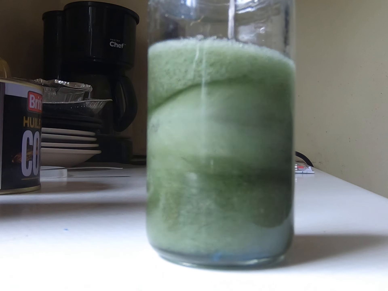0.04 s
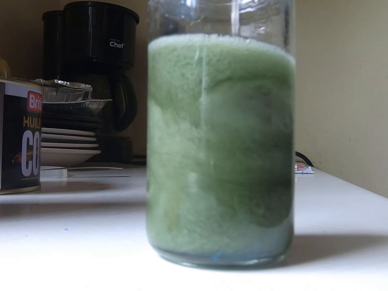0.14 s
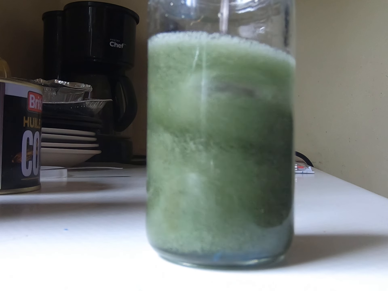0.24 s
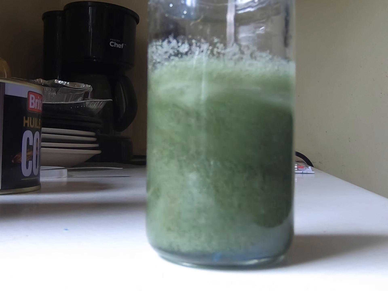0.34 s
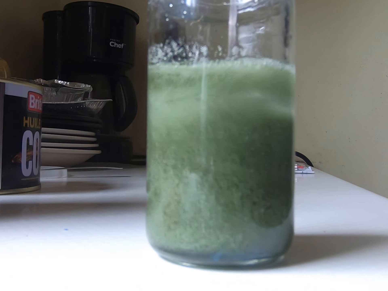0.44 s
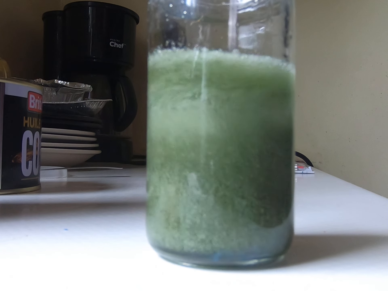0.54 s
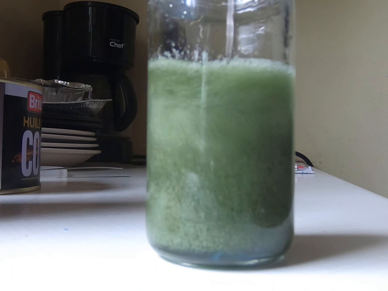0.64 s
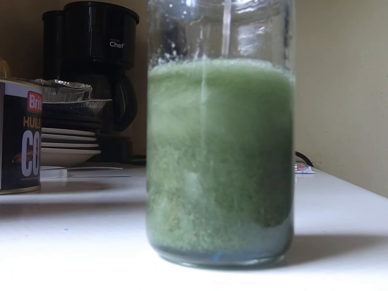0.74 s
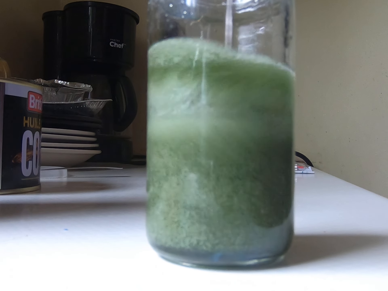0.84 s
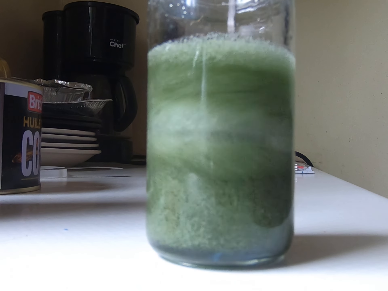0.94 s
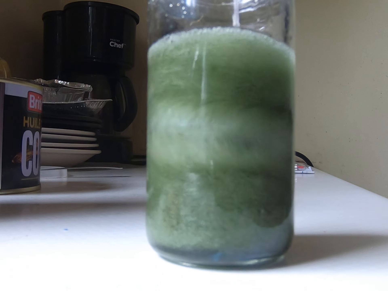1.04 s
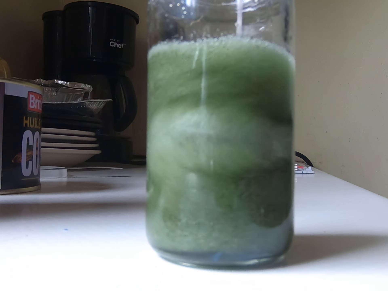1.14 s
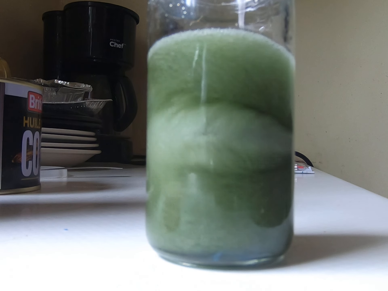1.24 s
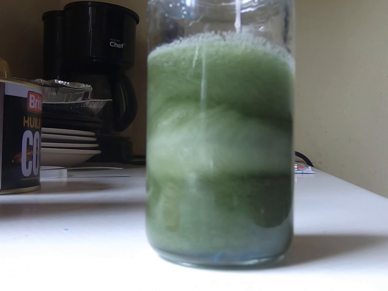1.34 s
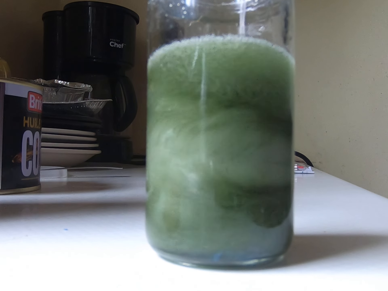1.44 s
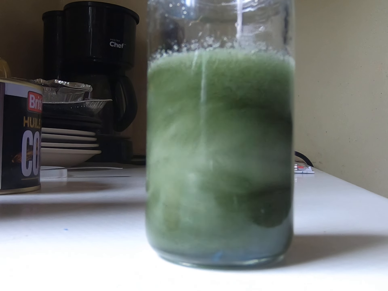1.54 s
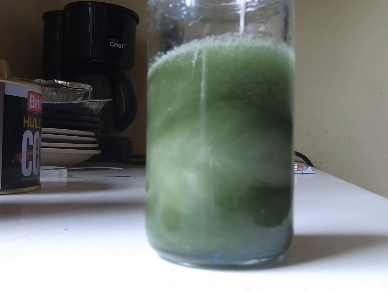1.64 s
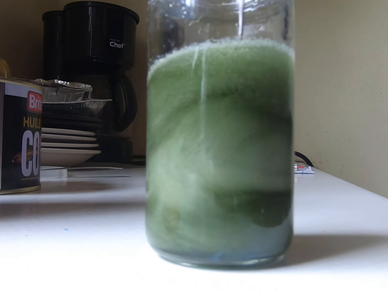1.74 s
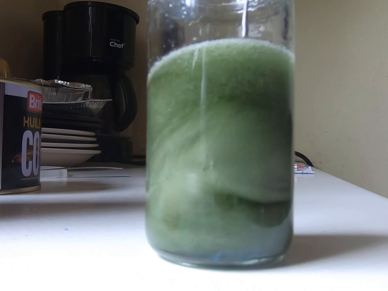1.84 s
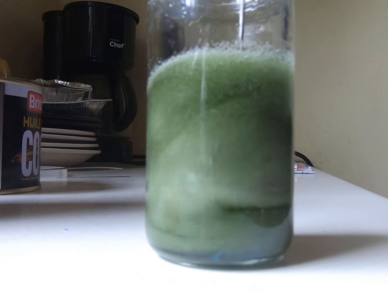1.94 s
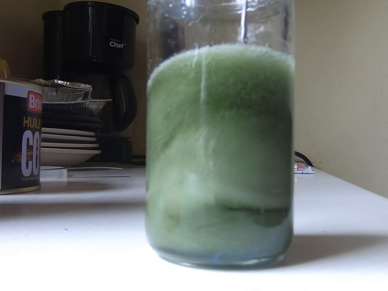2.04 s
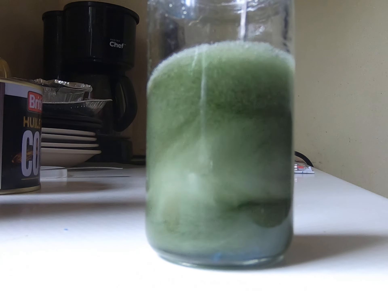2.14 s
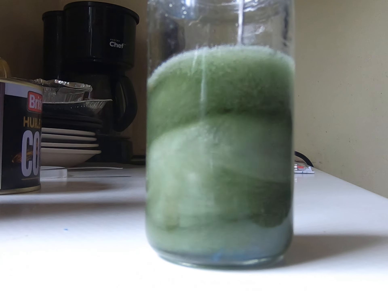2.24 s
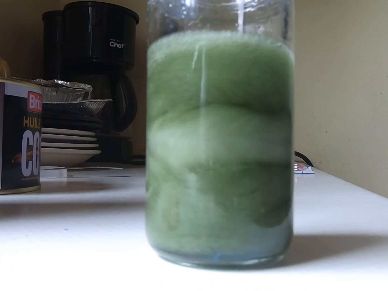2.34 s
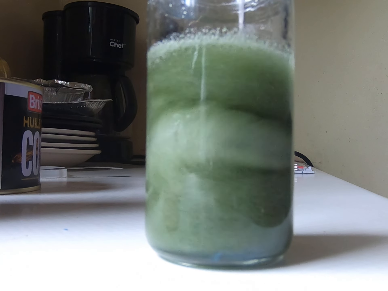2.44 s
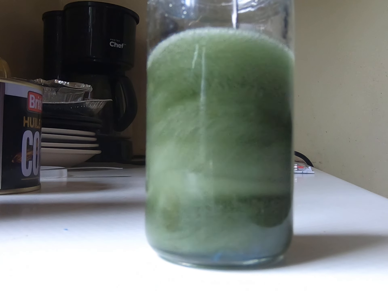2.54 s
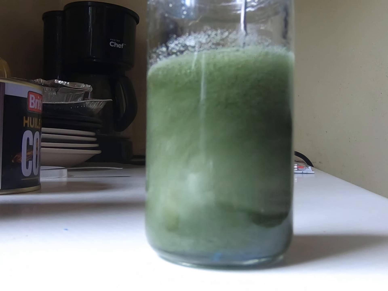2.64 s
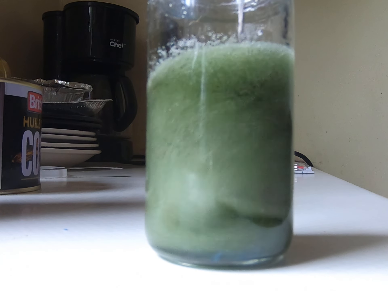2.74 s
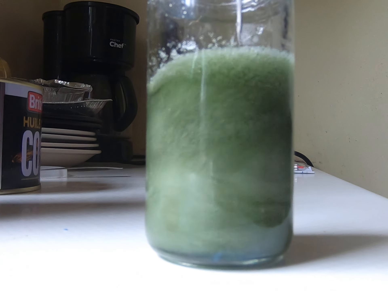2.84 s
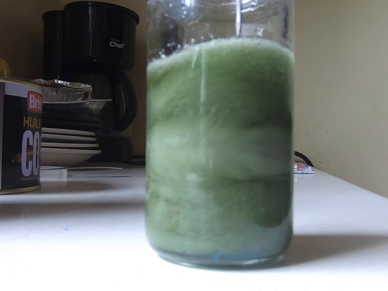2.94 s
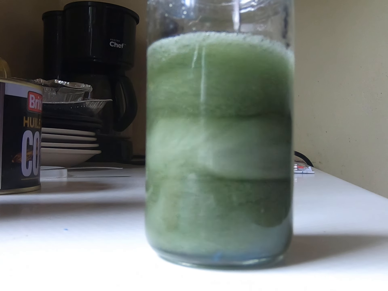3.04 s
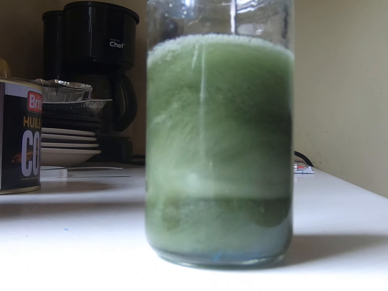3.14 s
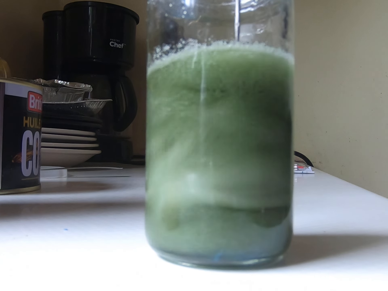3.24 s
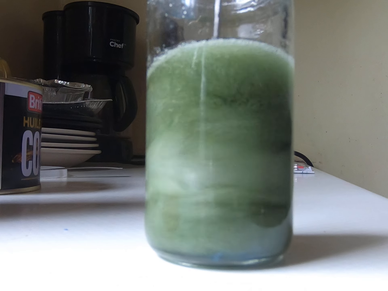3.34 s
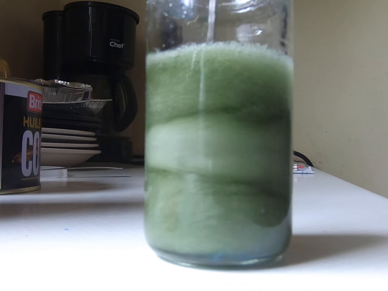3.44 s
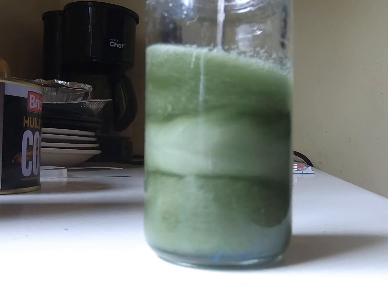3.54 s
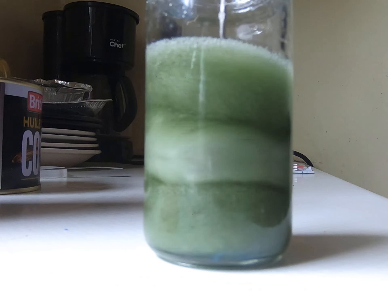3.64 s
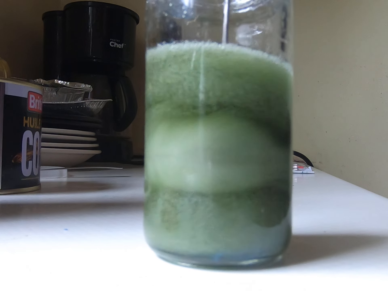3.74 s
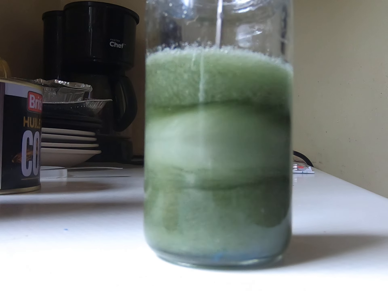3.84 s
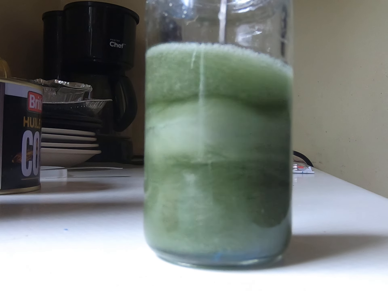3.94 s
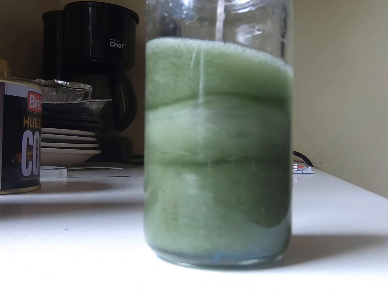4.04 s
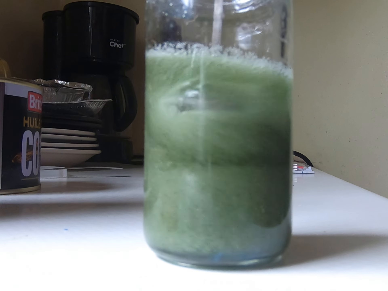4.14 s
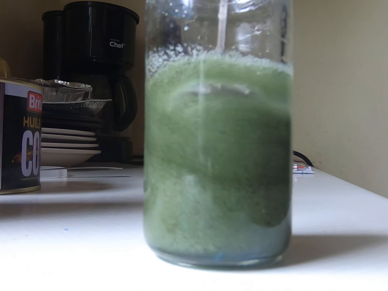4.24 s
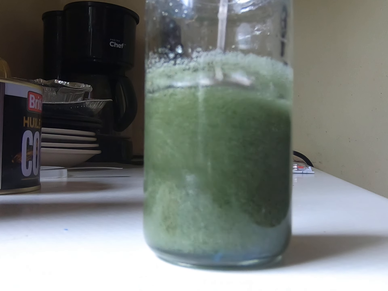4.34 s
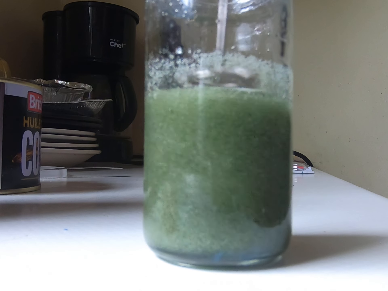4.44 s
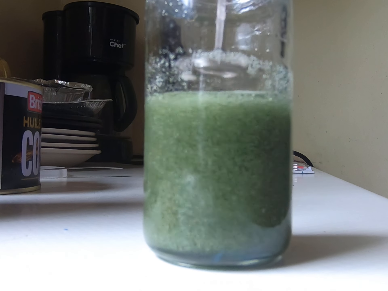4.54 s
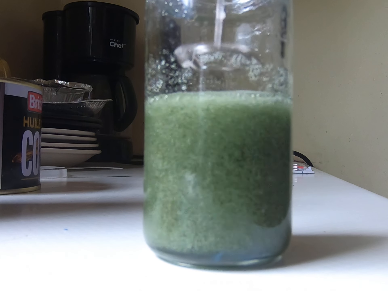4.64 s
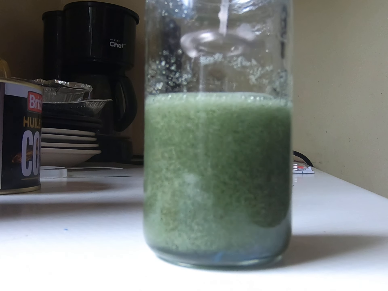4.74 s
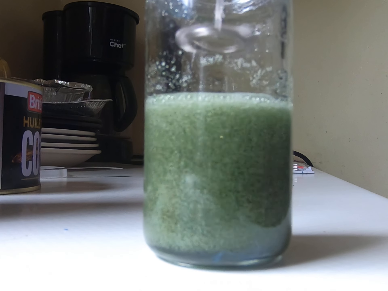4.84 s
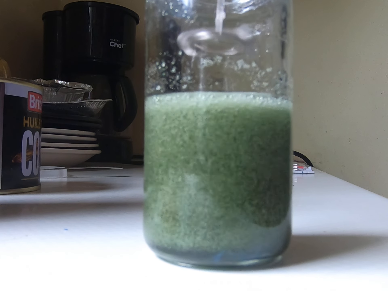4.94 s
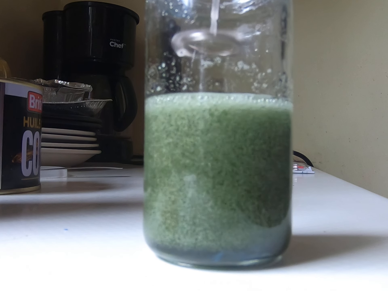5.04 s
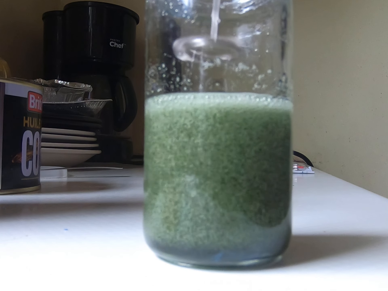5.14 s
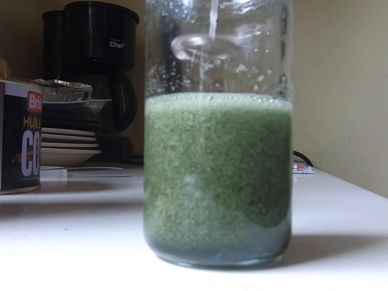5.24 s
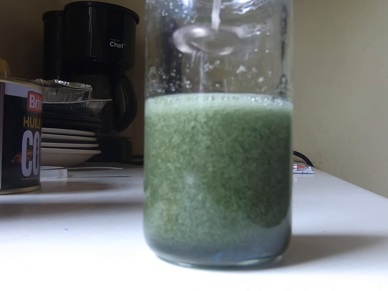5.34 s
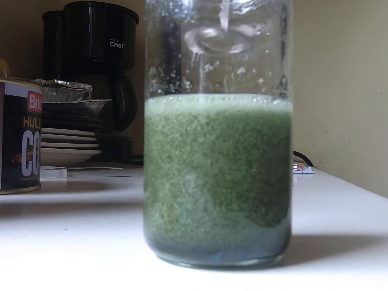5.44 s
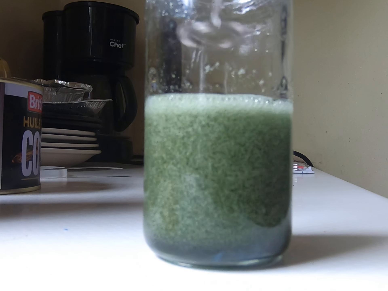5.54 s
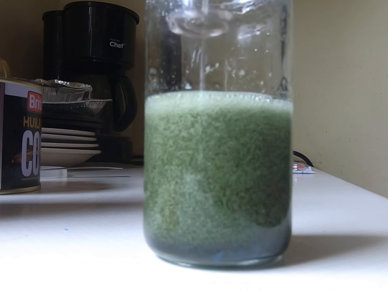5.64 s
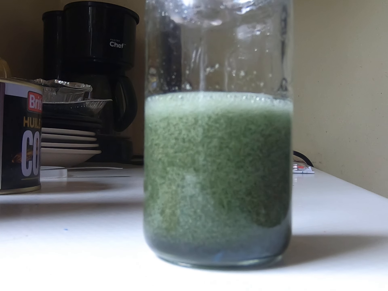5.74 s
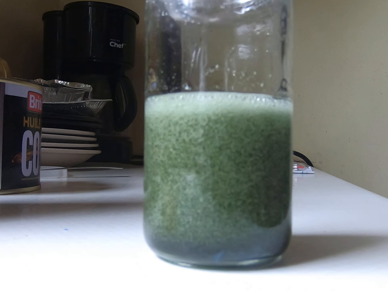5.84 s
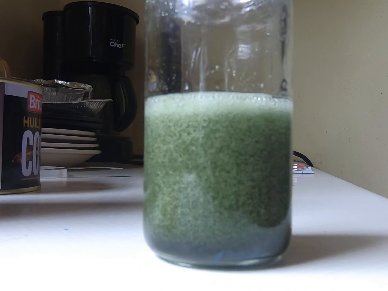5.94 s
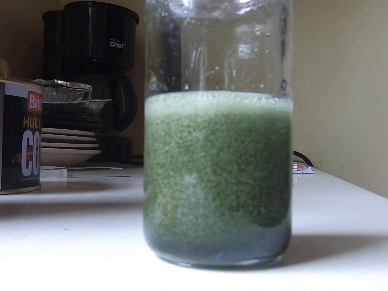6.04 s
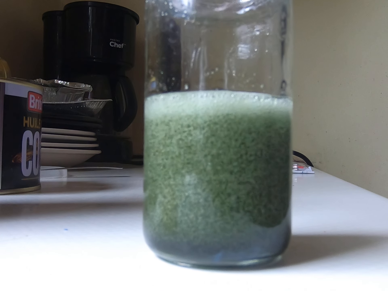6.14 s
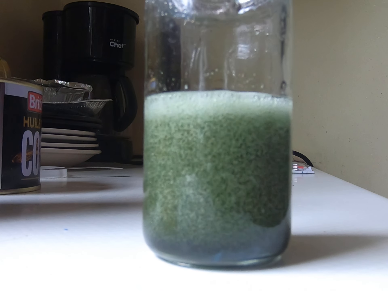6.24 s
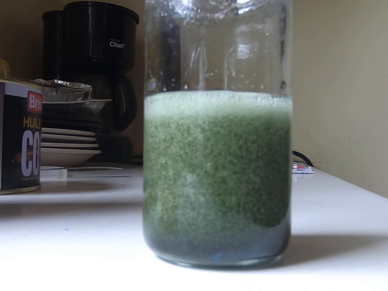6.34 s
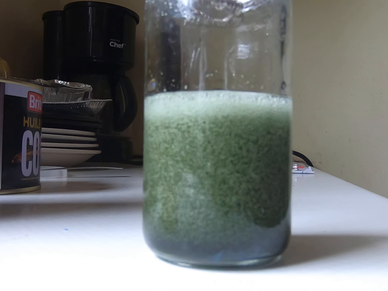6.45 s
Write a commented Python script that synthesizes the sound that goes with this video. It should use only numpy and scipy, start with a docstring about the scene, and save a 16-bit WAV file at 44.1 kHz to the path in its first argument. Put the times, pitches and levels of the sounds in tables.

```python
"""Battery whisk in a glass jar

A small battery whisk churns oil and wax in a glass jar on a kitchen counter, close to the microphone.
Deep in the liquid the motor labours and the vortex gulps air; near the surface it speeds up and rattles.
Lifted clear it buzzes cleanly, brushes the glass, and runs down with a few last knocks.
One turning shaft times the tones, scrapes and knocks; shaped noise bursts make the liquid and glass."""
import sys
import numpy as np
from scipy import signal
from scipy.fft import rfft, irfft
from scipy.io import wavfile
from scipy.ndimage import uniform_filter1d

SR = 44100
rng = np.random.default_rng(int(sys.argv[2]) if len(sys.argv) > 2 else 0)


def to_wav(s):
    """Save 16-bit WAV."""
    ch = np.atleast_2d(s).T  # columns
    pcm = np.round(np.clip(ch, -1, 1) * 32767)  # PCM
    wavfile.write(sys.argv[1], SR, pcm.astype(np.int16))


N = 285765
TIME = np.arange(N) / SR  # seconds

# Shaft speeds (turns per second): deep in the liquid, skimming the surface, free in the air
LADEN_HZ, SKIM_HZ, FREE_HZ = 55, 146, 184.2
STALL_HZ = 34.6  # below this speed the motor fades out
# Moments (s): out of the liquid, spray flung off, drawn higher away from the microphone, switched off
OUT_S, SHED_S, RAISED_S, OFF_S = 4.51, 4.63, 5.65, 5.94


def gain_of(db):
    """Turns decibels into amplitude."""
    return 10 ** (np.asarray(db) / 20)


def evened(x):
    """Scales to an rms of one."""
    return x / np.sqrt(np.mean(x ** 2) + 1e-20)


def steadied(x, size=4000):
    """Scales to a running rms of about one."""
    power = uniform_filter1d(uniform_filter1d(x ** 2, size), size)
    return x / np.sqrt(abs(power) + 1e-4 * np.mean(x ** 2))


def ramp(x, start, end):
    """Goes from 0 to 1 as x goes from start to end."""
    return np.clip((x - start) / (end - start), 0, 1)


def held(s, length, db, onset_db_per_s=249, release_db_per_s=117):
    """A gain that rises quickly to db at time s, holds, and dies away."""
    early = np.maximum(s - TIME, 0)
    late = np.maximum(TIME - s - length, 0)
    return gain_of(db - onset_db_per_s * early - release_db_per_s * late)


def read(points, hz):
    """Reads a frequency table, joining its points on a log-frequency axis."""
    f, value = np.transpose(points)
    return np.interp(np.log(hz + 1), np.log(f + 1), value)


def drift(hz):
    """Random wandering of about unit size, with hz new random points a second."""
    knots = rng.standard_normal(N // 20)
    return np.interp(TIME * hz, np.arange(len(knots)), knots)


def add(mix, s, sound):
    """Mixes a sound in at time s."""
    part = mix[max(round(s * SR), 0):][:len(sound)]
    part += sound[:len(part)]


def colour(x, points, rings=(), size=4096):
    """Passes x through a body with this spectrum and these narrow rings, which answers only after the blow."""
    hz = abs(np.fft.fftfreq(size, 1 / SR))
    octaves_above = np.maximum(np.log2((hz + 1) / points[-1][0]), 0)
    octaves_below = np.maximum(np.log2(points[0][0] / (hz + 1)), 0)
    gain = gain_of(read(points, hz) - 30 * (octaves_above + octaves_below))
    gain = gain * (1 + sum(gain_of(db) / (1 + (2 * (hz - f) / width) ** 2) for f, width, db in rings))
    log_gain = np.log(gain + 1e-5)
    # Minimum phase: nothing sounds before the blow
    response = np.fft.ifft(np.exp(np.conj(signal.hilbert(log_gain)))).real
    return signal.oaconvolve(x, response)[:N]


def strikes(turns, place, jitter, spread_db, size=8):
    """One sharp impulse each time the shaft passes a place, loose in angle (turns) and in strength."""
    n = np.arange(1, int(turns[-1]))
    slip, force = rng.standard_normal((len(n), 2)).T
    at = np.interp(n + place + jitter * slip, turns, np.arange(N))
    taps = at.astype(int)[:, None] + np.arange(1 - size, size + 1)
    offset, out = taps - at[:, None], np.zeros(N)
    strength = gain_of(spread_db * np.clip(force, -2, 2))[:, None]
    # A windowed sinc places each impulse between samples
    impulse = np.sinc(offset) * np.cos(np.pi * offset / (2 * size)) ** 2
    np.add.at(out, np.clip(taps, 0, N - 1), strength * impulse)
    return out


def chatter(x, decay_s, size=400):
    """Spreads each contact into a brief chatter, nearly keeping its colour."""
    burst = rng.standard_normal(size) * np.exp(-np.arange(size) / (decay_s * SR))
    flat = irfft(np.exp(1j * np.angle(rfft(burst, 2 * size))))[:size]
    return np.convolve(x, flat)[:N]


def blows(rows, points, decay_s, size=2500):
    """For each row of (t/s, peak level/dB) a short burst of noise rings a body."""
    out, t = np.zeros(N), np.arange(size) / SR
    for s, db in rows:
        ring = colour(rng.standard_normal(size) * np.exp(-t / decay_s), points)
        add(out, s, gain_of(db) * ring / abs(ring).max())
    return out


# Faint low background of the kitchen: f/Hz, level/dB (per Hz, relative)
KITCHEN_COLOUR = [(20, -7), (50, 5.5), (100, -11), (150, 1.5), (200, 6), (260, -4), (500, -10), (1000, -21),
                  (4000, -41), (15000, -33)]


def kitchen(db=-73):
    """Faint low room noise, partly shared by the two microphone ports."""
    shared, left, right = (evened(colour(rng.standard_normal(N), KITCHEN_COLOUR)) for _ in range(3))
    return gain_of(db) * np.array([shared + .5 * left, shared + .5 * right])


# Colour of the echoes when they start: f/Hz, level/dB (relative)
ECHO_COLOUR = [(150, -5), (400, 5), (800, 3.5), (2000, 1), (6000, 1.5), (8500, 5), (13000, 2.5)]
# Time the echoes take to fall by 60 dB: f/Hz, t/s
ECHO_TIMES = [(150, 1.8), (300, 0.23), (600, 0.47), (2000, 0.44), (6000, 0.29), (14000, 0.18)]


def room(x, size=30000):
    """Reflections from the counter and walls, each band dying at its own speed."""
    sparse = rng.random((2, size)) < .1
    taps = rng.standard_normal((2, size)) * sparse * (np.arange(size) > .002 * SR)
    hz, t, z = signal.stft(taps, SR, nperseg=256)
    field_db = read(ECHO_COLOUR, hz)[:, None] - 60 * t / read(ECHO_TIMES, hz)[:, None]
    tail = signal.istft(z * gain_of(field_db), SR, nperseg=256)[1]
    return signal.fftconvolve(x[None], tail / np.linalg.norm(tail[0]), axes=1)[:, :N]


# Left port against right: f/Hz, level/dB (left minus right)
PORT_BALANCE = [(60, -5), (110, 5), (200, -2), (380, 4), (700, -1.5), (1290, -0.5), (2380, 7.5), (4400, 0),
                (8120, 0.5), (15000, -13.5)]
# How far the left port leads: f/Hz, phase/rad
PORT_PHASE = [(0, -4), (430, 1.21), (690, -0.93), (2070, 1.63), (2840, 0.8), (4910, 0), (6550, 1.5),
              (7150, 2), (8350, 2), (9560, -8.5), (11100, 2), (11900, 1), (12400, 3), (15300, 13)]


def ports(x):
    """The two microphone ports hear the jar with different level and phase."""
    hz = np.fft.rfftfreq(2 * N, 1 / SR)
    # Half the difference goes to each side
    left = gain_of(read(PORT_BALANCE, hz) / 2) * np.exp(.5j * read(PORT_PHASE, hz))
    pair = np.array([left, 1 / left])
    return irfft(rfft(x, 2 * N) * pair / np.maximum(abs(pair.mean(0)), .6))[:, :N]


def glass_echo(x, db=-8, echo_s=.0018, sway_s=.0001, sway_per_s=6, above_hz=5000):
    """The treble glances off the glass to each port by a path that shifts with the hand: partials swell and fade."""
    treble = signal.sosfilt(signal.butter(4, above_hz, "high", fs=SR, output="sos"), x)
    paths = [np.interp(TIME - echo_s - sway_s * drift(sway_per_s), TIME, treble) for _ in range(2)]
    return gain_of(db) * np.array(paths)


# Whisk head against glass, before the trim in jar(): t/s, level/dB (peak)
CLACKS = [(4.2867, -19), (4.3066, -21), (4.3605, -17), (4.3834, -16.5), (4.4174, -18), (4.4714, -17.5),
          (4.623, -25), (5.465, -27), (5.609, -23), (5.616, -24), (5.652, -24), (5.766, -29),
          (6.1554, -18.5), (6.1704, -25), (6.1794, -25), (6.2028, -21), (6.2625, -34), (6.2835, -35),
          (6.3315, -38), (6.343, -42), (6.374, -52)]
# Dull bumps of the jar, before the trim in jar(): t/s, level/dB (peak)
BUMPS = [(4.395, -32), (4.47, -38), (4.583, -41.5), (5.604, -30), (5.624, -30.5), (5.648, -52),
         (5.955, -35.5), (5.98, -37), (6.039, -28), (6.17, -35.5), (6.26, -38), (6.338, -37.5)]
# The head swings wide and clacks once a turn: start t/s, length t/s, typical level/dB (peak)
WOBBLES = [(0.27, .07, -27), (0.345, .06, -22), (0.615, .05, -23), (4.17, .1, -29), (4.32, .18, -23.5),
           (5.965, .065, -19.5)]
# Bright colour of a clack: f/Hz, level/dB (per Hz, relative)
CLACK_COLOUR = [(500, -15.5), (1900, -14.5), (2700, -17), (3300, -3.5), (4300, 0), (5200, -7.5), (6300, -6),
                (7500, -19.5), (11000, -29.5), (15000, -75)]
# Dull colour of the full jar: f/Hz, level/dB (per Hz, relative)
BUMP_COLOUR = [(110, -45), (150, 6.5), (250, -3), (380, 6), (550, -4.5), (750, -4), (1200, -8.5),
               (1900, -9), (3000, -24)]


def jar(speed, clack_db=0.0, bump_db=-1, spread_db=1.9):
    """The head strikes the glass with a bright clack; the full jar gives dull bumps."""
    new_turn = np.diff(np.floor(np.cumsum(speed) / SR), prepend=0) > 0
    hits = list(CLACKS)
    for start, length, db in WOBBLES:
        for s in TIME[new_turn & (TIME > start) & (TIME < start + length)]:
            hits.append((s, db + spread_db * rng.standard_normal()))
    clacks = blows(hits, CLACK_COLOUR, decay_s=.0012)
    bumps = blows(BUMPS, BUMP_COLOUR, decay_s=.011)
    return gain_of(clack_db) * clacks + gain_of(bump_db) * bumps


# Round bubbles under the surface: t/s, starting pitch f/Hz, level/dB (about the peak)
GLUGS = [(1.103, 286, -34.5), (2.314, 292, -34), (2.335, 284, -33.5), (2.439, 710, -39.5),
         (2.442, 342, -43), (2.952, 277, -34), (3.054, 308, -35), (3.137, 680, -36)]


def glugs(glide_per_s=-14, rise_s=0.0036, decay_s=0.0056, size=2000):
    """Each large bubble rings for a few cycles, sagging in pitch."""
    out, t = np.zeros(N), np.arange(size) / SR
    swell = (1 - np.exp(-t / rise_s)) ** 2 * np.exp(-t / decay_s)
    for s, hz, db in GLUGS:
        cycles = np.cumsum(hz * np.exp(glide_per_s * t)) / SR
        add(out, s, gain_of(db) * swell / swell.max() * np.sin(2 * np.pi * cycles))
    return out


# Big air pockets swallowed by the vortex, before the trim in gulps(): t/s, level/dB (peak of the burst)
GULPS = [(0.099, -22.5), (0.701, -29), (1.061, -22), (1.087, -24), (1.426, -25), (1.477, -29), (1.532, -28),
         (1.671, -30), (1.762, -28.5), (2.333, -25), (2.407, -21), (2.489, -27), (2.509, -26.5),
         (2.525, -26), (2.987, -22.5), (3.041, -27.5), (3.055, -28), (3.112, -28), (3.127, -25),
         (3.475, -27.5), (3.501, -29), (3.879, -29.5), (3.958, -20), (3.978, -25.5), (3.998, -20.5),
         (4.018, -23), (4.283, -24)]
# Splashy upper colour, also used by liquid(): f/Hz, level/dB (per Hz, relative)
SLOSH_COLOUR = [(400, -29.5), (480, -26), (620, -1.5), (730, -5.5), (860, -12.5), (1020, -2.5), (1170, -3),
                (1390, -2), (1560, -2), (1720, -11.5), (2000, -13.5), (2400, -30.5)]
# Deep liquid colour, also used by liquid() and shake(): f/Hz, level/dB (per Hz, relative)
BURBLE_COLOUR = [(59, -42), (100, -37.5), (113, -57), (135, -10), (172, -8.5), (194, -4), (226, -9),
                 (248, 1.5), (321, -11), (348, -2.5), (441, -6), (560, -7), (730, -23.5), (1230, -120)]
SMALL_GULPS_PER_S, SMALL_GULP_DB = 2, -34.5  # the level is typical, before the same trim
THUMP_DB = -19.5  # relative to the burst


def gulps(speed, slosh_db=-1, spread_db=2):
    """Each air pocket bursts in the jar and thumps the liquid; small ones come by chance while the head is deep."""
    deep = (speed < (LADEN_HZ + SKIM_HZ) / 2) & (TIME < OUT_S)
    small = TIME[deep & (rng.random(N) < SMALL_GULPS_PER_S / SR)]
    pockets = list(GULPS) + [(s, SMALL_GULP_DB + spread_db * rng.standard_normal()) for s in small]
    burst = blows(pockets, SLOSH_COLOUR, decay_s=.004)
    thump = blows(pockets, BURBLE_COLOUR, decay_s=.006)
    return gain_of(slosh_db) * (burst + gain_of(THUMP_DB) * thump)


def bubbles(per_s, spread_db, wash_db):
    """Many small pops of uneven size over a wash of noise."""
    signs = (rng.random(N) < per_s / SR) * rng.choice([-1, 1], N)
    pops = signs * gain_of(spread_db * np.minimum(rng.exponential(1, N), 3))
    return evened(pops) + gain_of(wash_db) * rng.standard_normal(N)


def depth(speed):
    """How deep the head sits, 0 to 1: the deeper, the slower it turns."""
    return 1 - ramp(speed, LADEN_HZ, FREE_HZ)


# The vortex opens and draws air down: middle t/s, half length t/s, slosh level/dB, deep burble level/dB
SURGES = [(0.204, 0.11, -41, -64), (0.685, 0.045, -37, -50), (1.08, 0.18, -37, -46.5),
          (1.408, 0.14, -39.5, -44), (1.717, 0.2, -44, -44.5), (2.434, 0.11, -41.5, -41.5),
          (3.06, 0.12, -41, -43.5), (3.62, 0.19, -42.5, -44.5), (3.99, 0.074, -47, -41),
          (4.17, 0.099, -41.5, -46.5)]
CALM_SLOSH_DB, CALM_BURBLE_DB = -48, -49  # between surges at full depth, before the trims in liquid()


def churn(speed):
    """Gains of slosh and deep burble: a calm base while the head is deep, and a bell-shaped swell per surge."""
    power = (gain_of([[CALM_SLOSH_DB], [CALM_BURBLE_DB]]) * depth(speed)) ** 2
    for s, half, slosh_db, burble_db in SURGES:
        power = power + gain_of([[slosh_db], [burble_db]]) ** 2 * np.exp(-((TIME - s) / half) ** 2)
    return np.sqrt(power)


# Narrow rings of the filled jar: f/Hz, width f/Hz, level/dB (above the slosh and burble)
JAR_RINGS = [(161, 8.3, -11), (207.5, 42, 2), (254.6, 20, 2.5), (296, 46, 1.5), (350, 33, -13),
             (602, 45, -10), (1371, 55, 1), (1468, 40, -5)]
# The head slaps the liquid once a turn: steady share of the slosh, and length of the slap (turns)
FLUTTER_BASE, FLUTTER_TURNS = .65, .25
FOAM_DB = -64.5  # the liquid swirls on after the head has left it


def liquid(speed, slosh_db=0.0, burble_db=-3.0, lumps_db=0.5, deep_lumps_db=1, heave_db=2.23, end_s=4.55):
    """Bubbles ring the air in the jar and the liquid below it, in lumps, until the head comes out."""
    upper, deep = churn(speed) * gain_of(heave_db * drift(18))
    lumps = drift(90)
    flutter = FLUTTER_BASE + np.exp(-(np.cumsum(speed) / SR % 1) / FLUTTER_TURNS)
    splashes = bubbles(1600, 1.8, -6.0) * flutter * gain_of(lumps_db * lumps)
    slosh = steadied(colour(splashes, SLOSH_COLOUR, JAR_RINGS))
    deep_pops = bubbles(400, 5.8, -1.7) * gain_of(deep_lumps_db * lumps)
    burble = steadied(colour(deep_pops, BURBLE_COLOUR, JAR_RINGS, size=8192))
    dipped = np.clip((end_s - TIME) / 0.26, 0, 1)
    foam = gain_of(FOAM_DB) * (1 - dipped) * (1 - ramp(TIME, RAISED_S, OFF_S + 0.36))
    stirred = upper * gain_of(slosh_db) * slosh + deep * gain_of(burble_db) * burble
    return dipped * stirred + foam * slosh


# The free head grazes the glass: t/s, length t/s, strength level/dB, speed lost (turns per second)
GRAZES = [(4.595, 0.018, -3, 0.071), (5.452, 0.097, -4, 0.093), (5.606, 0.041, -1, 1.6),
          (5.732, 0.034, -6.5, 0.23)]


def grazing():
    """How hard the free head rubs the glass: it catches at once and soon comes clear."""
    rubs = [held(s, length, db, onset_db_per_s=903, release_db_per_s=188) for s, length, db, _ in GRAZES]
    return np.max(rubs, axis=0)


# Shaft speed against the drag of the liquid; it races when the head nears the surface: t/s, f/Hz (turns per second)
SPEED = [(0, 45), (.21, 53), (.4, 125.3), (.434, 135.9), (.508, 146.4), (.562, 145.9), (.604, 141.4),
         (.724, 143.3), (.788, 150.2), (.85, 151.9), (.88, 150.6), (.95, 127), (1.14, 63), (1.36, 69),
         (1.54, 56), (1.88, 48.5), (2.12, 48.5), (2.27, 58), (2.52, 63), (2.66, 47), (3.1, 59), (3.24, 51),
         (3.6, 57), (3.85, 46), (4.07, 56), (4.25, 90), (4.4, 141)]
SPIN_UP_S, RECOVER_S = .11, .1  # how fast it speeds up in the air, and recovers from a graze
FILM_DRAG_HZ, FILM_SHED_S = 5, .33  # speed the clinging oil costs at first, and how fast it is shed
COAST_HZ_PER_S = 438  # speed lost each second after switch-off


def shaft_speed():
    """Drag sets the speed in the liquid; lifted out, the head spins up and sheds its oil; then it coasts down."""
    lift_s, lift_hz = SPEED[-1]
    since = np.maximum(TIME - lift_s, 0)
    spin_up = (FREE_HZ - lift_hz - FILM_DRAG_HZ) * np.exp(-since / SPIN_UP_S)
    free = FREE_HZ - spin_up - FILM_DRAG_HZ * np.exp(-since / FILM_SHED_S)
    sag = np.zeros(N)
    for s, length, _, lost in GRAZES:
        recovery = np.exp(-np.maximum(TIME - s - length, 0) / RECOVER_S)
        sag += lost * ramp(TIME, s, s + length) * recovery
    s, hz = np.transpose(SPEED)
    running = np.where(TIME < lift_s, np.interp(TIME, s, hz), free) - sag
    return np.maximum(running - COAST_HZ_PER_S * np.maximum(TIME - OFF_S, 0), 1)


# The uneven share of the sound: at the surface (dB), its fall in the air (dB per s), and where it settles (dB)
SKIM_UNEVEN_DB, SETTLE_DB_PER_S, SETTLED_DB = -.8, 73, -18.5


def unevenness(speed, skim_from_hz=132):
    """The shaft runs unevenly in the liquid, settles in the air, and is upset by each graze and by coasting."""
    dipped_db = SKIM_UNEVEN_DB * ramp(speed, skim_from_hz, SKIM_HZ)
    falling_db = dipped_db - SETTLE_DB_PER_S * np.maximum(TIME - SHED_S, 0)
    settling = gain_of(np.maximum(falling_db, SETTLED_DB))
    return np.minimum(np.max([settling, grazing(), ramp(TIME, OFF_S, OFF_S + .015)], axis=0), 1)


def hum(turns, orders, once=0.29, twice=1.0, size=2048):
    """The shaft's harmonics: a wave that repeats every turn, with one strong and one weak swell."""
    angle = np.arange(size) / size
    swell = np.exp(once * np.cos(2 * np.pi * angle) + twice * np.cos(2 * np.pi * 2 * angle))
    phases = np.angle(rfft(rng.standard_normal(size) * swell))
    wave = sum(gain_of(db) * np.cos(2 * np.pi * round(k) * angle + phases[round(k)]) for k, db in orders)
    return evened(np.interp(turns, angle, wave, period=1))


# The whirling head shakes the jar and counter: multiple of the shaft speed, level/dB (relative)
SHAKE_ORDERS = [(1, 21.5), (2, 10), (3, 0), (4, 0.5), (5, -4.5), (6, 1)]
# The head swings off centre and shakes the jar: t/s, length t/s, level/dB
SWINGS = [(0.07, 0.25, -50), (0.777, 0.11, -55.5)]
SHAKE_DIPPED_DB, SHAKE_COAST_DB = -56, -50  # at full depth, and when coasting at free speed


def shake(turns, speed, dipped, coasting):
    """The whirling head shakes the jar at low multiples of the shaft speed, most when deep or off centre."""
    coast_sway = gain_of(SHAKE_COAST_DB) * coasting * np.sqrt((speed - 1) / FREE_HZ)
    sway = gain_of(SHAKE_DIPPED_DB) * dipped * depth(speed) + coast_sway
    sway = np.maximum(sway, sum(held(*row) for row in SWINGS))
    return sway * steadied(colour(hum(turns, SHAKE_ORDERS), BURBLE_COLOUR)) * gain_of(2 * drift(30))


# The air in the jar as the skimming head drives it: f/Hz, level/dB (relative)
WHINE_COLOUR = [(140, -21), (430, -20), (600, -4), (730, 1.5), (800, -1), (1020, -16), (1300, -6),
                (1600, -4), (1780, -7), (1900, 6), (1980, 5), (2140, 1), (2300, -16), (2600, -12),
                (2900, -7), (3150, -16)]
# How long the air sings while the head skims: t/s, length t/s, level/dB (before the trim in whine())
SINGING = (0.47, 0.43, -40)


def whine(turns, whine_db=1.5):
    """The skimming head pushes and pulls the air in the jar once a turn: mostly odd harmonics."""
    push, pull = (strikes(turns, place, .003, 1) for place in (0, .5))
    sung = steadied(colour(push - pull, WHINE_COLOUR))
    return gain_of(whine_db) * held(*SINGING, onset_db_per_s=119) * sung


# Colour of the tapping bearing: f/Hz, level/dB (per Hz, relative)
TAP_COLOUR = [(3000, -21.5), (3900, -2.5), (4250, -11.5), (4500, 4.5), (4750, -9.5), (5500, -24)]


def bearing_taps(turns, db=-52.5):
    """The laden shaft taps its bearing once a turn."""
    return gain_of(db) * steadied(colour(strikes(turns, .2, .01, 2), TAP_COLOUR))


# Colour of the sparking brushes: f/Hz, level/dB (per Hz, relative)
TICK_COLOUR = [(6500, -31), (8000, -11), (8400, -2), (9900, -4.5), (10700, 4.5), (12000, 2), (13200, -5.5),
               (14000, -17), (15500, -20)]


def ticks(turns, uneven, spark_db=-10, fizz=0.51):
    """Three armature poles spark in turn, unequally; the sparks fizz when the motor runs unevenly."""
    poles = sum(gain_of(db) * strikes(turns, .45 + k / 3, .0002, 1) for k, db in enumerate([0, -1.5, -3.5]))
    glow = signal.lfilter([1], [1, -np.exp(-1 / (.0005 * SR))], abs(poles))
    sparks = (gain_of(spark_db) + fizz * uneven) * steadied(glow * rng.standard_normal(N))
    return steadied(colour(steadied(chatter(poles, 0.00075)) + sparks, TICK_COLOUR))


# Colour of the knocking shaft: f/Hz, level/dB (per Hz, relative)
RATTLE_COLOUR = [(290, -32), (500, -15.5), (655, -8.5), (724, -5), (835, -11), (1320, -1), (1750, -5),
                 (1910, 3), (2290, -6.5), (3200, -5), (3750, 4.5), (4400, 3.5), (4750, -1.5), (5100, 5),
                 (5500, -5), (6480, -1.5), (7380, -9.5), (7700, -20), (11100, -35), (15000, -40.5)]


def rattle(turns, rebound_db=-4, scrape_db=0.0, scrape_turns=0.11):
    """The whirling shaft knocks once a turn, rebounds, and scrapes after each knock."""
    knock, rebound = (strikes(turns, place, .008, 2) for place in (0, .43))
    knocks = chatter(knock + gain_of(rebound_db) * rebound, .0008)
    scrape = rng.standard_normal(N) * (1.4 + np.exp(-(turns % 1) / scrape_turns)) * gain_of(2 * drift(120))
    return steadied(colour(steadied(knocks) + gain_of(scrape_db) * evened(scrape), RATTLE_COLOUR))


# The head rides squarely on the surface: t/s, length t/s, level/dB
RIDE = (0.508, 0.1, -33)
# Colour of the knocks once in step: f/Hz, level/dB (per Hz, relative)
IN_STEP_COLOUR = [(1500, -22), (2100, -8), (2600, -5), (3300, -6), (3800, 1), (4300, 5), (4600, 2),
                  (4850, -9), (5150, 1), (5500, -6), (7200, -6), (7800, -22)]


def ride(turns, rebound_db=-6):
    """Riding squarely on the surface, the shaft knocks in near-strict step, giving a pitched rasp."""
    knock, rebound = (strikes(turns, place, .002, 1) for place in (0, .43))
    knocks = chatter(knock + gain_of(rebound_db) * rebound, .002)
    return held(*RIDE) * steadied(colour(knocks, IN_STEP_COLOUR))


# The head skims the surface: t/s, length t/s, level/dB (before the skim trim)
SKIMS = [(0.464, 0.43, -41), (0.53, 0.029, -31), (4.415, 0.13, -61)]
# Before the trims: rattle at skimming speed and above, and its fall below that speed
RATTLE_DB, RATTLE_DB_PER_OCTAVE = -32.5, 17.5
RIDING_DB = -5  # drop in loose rattle while the head rides the surface


def knocking(turns, speed, uneven, dipped, coasting, free_db=-11, graze_db=-2, coast_db=-1, skim_db=3.0):
    """The loose shaft rattles in the liquid, at grazes, at skims and when coasting, and knocks in step riding."""
    skimming = np.max([held(*row) for row in SKIMS], axis=0)
    riding = held(*RIDE[:2], 0)
    whirl = np.max([dipped * uneven, gain_of(free_db) * uneven,
                    gain_of(graze_db) * grazing(), gain_of(coast_db) * coasting], axis=0)
    whirl = whirl * gain_of(RATTLE_DB + RATTLE_DB_PER_OCTAVE * np.log2(np.minimum(speed / SKIM_HZ, 1)))
    loose = np.hypot(whirl, gain_of(skim_db) * skimming) * gain_of(RIDING_DB * riding)
    return loose * rattle(turns) + ride(turns)


# Colour of the scraping brushes: f/Hz, level/dB (per Hz, relative)
RASP_COLOUR = [(1060, -29), (1800, 3.5), (2430, -5), (2930, 0), (3200, -1.5), (4000, 0.5), (6340, 6),
               (6990, 1), (7580, -3.5), (8500, -6), (9460, -10.5), (11700, -21), (14000, -32), (15000, -37)]
# Narrow rings of the motor case and shaft: f/Hz, width f/Hz, level/dB (above the rasp)
CASE_RINGS = [(2900, 62, 3), (4100, 93, 2), (4640, 110, -16), (5150, 62, -3), (5570, 45, 1.5),
              (6200, 46, -12), (7360, 57, 7.5), (7510, 60, 5)]


def rasp(turns, jitter=0.0063, spread_db=3, hiss_db=-3, gate=0.8, count=30):
    """The brushes scrape six commutator gaps a turn, with small flaws between them and some hiss."""
    gaps = sum(gain_of(-3 * (k % 2)) * strikes(turns, k / 6, jitter, spread_db) for k in range(6))
    flaws = sum(rng.standard_normal() * strikes(turns, rng.random(), 0.00054, spread_db) for _ in range(count))
    gap_phase = 2 * np.pi * 6 * turns
    hiss = rng.standard_normal(N) * (1 + gate * np.cos(gap_phase))
    scrape = gain_of(-10.5) * steadied(gaps) + gain_of(-4.5) * steadied(flaws) + gain_of(hiss_db) * hiss
    return steadied(colour(scrape, RASP_COLOUR, CASE_RINGS))


# The head breaks the surface: t/s, length t/s, level/dB
LIFT = (4.47, 0.16, -50.5)
# The tone rising then: multiple of the shaft speed, level/dB (relative)
LIFT_HUM = [(1, -4), (3, -13), (4, -14), (5, 0), (6, -9), (7, -5), (9, -6), (11, -3)]
# The falling tone after switch-off: multiple of the shaft speed, level/dB (relative)
COAST_HUM = [(1, -2), (2, 0), (3, -8), (4, -6), (5, -8)]


def glides(turns, coast_db=-46.5, coast_fade_db_per_s=65):
    """The shaft's low partials sing out as it spins up out of the liquid, and again as it runs down."""
    rising = held(*LIFT) * hum(turns, LIFT_HUM)
    fade = held(OFF_S + .02, 0, coast_db, onset_db_per_s=1200, release_db_per_s=coast_fade_db_per_s)
    speed = np.gradient(turns) * SR
    return rising + fade * hum(turns, COAST_HUM) * ramp(speed, STALL_HZ * 2, SKIM_HZ)


# The free-running buzz: multiple of the shaft speed, level/dB (relative)
BUZZ = [(1, -20), (2, -44), (3, -28), (4, -28), (5, -16), (6, -20), (7, -16), (8, -22), (9, -13), (10, -17),
        (11, -6.5), (12, -17), (13, -17), (14, -20), (15, -34), (16, -10), (17, -14), (18, -8), (19, -16),
        (20, -2), (21, -10), (22, -6), (23, -4), (24, 0), (25, -10), (26, -13), (27, -5), (28, -10),
        (29, -10), (30, -10), (31, -9), (32, -10), (33, -9), (34, -16), (35, -13), (36, -5), (37, -10),
        (38, -24), (39, -20), (40, -4), (41, -14), (42, -19), (43, -24), (44, -26), (45, -16), (46, -21),
        (47, -27), (48, -24), (49, -26), (50, -20), (51, -20), (52, -28), (53, -23), (54, -32), (55, -34),
        (56, -27), (57, -20), (58, -17), (59, -26), (60, -18), (61, -22), (62, -22), (63, -19), (64, -24),
        (65, -21), (66, -24)]
# The buzz with the head raised to the mouth of the jar: multiple of the shaft speed, level/dB (relative)
BUZZ_RAISED = [(1, -17), (2, -42), (3, -25), (4, -27), (5, -12), (6, -17), (7, -16), (8, -20), (9, -16),
               (10, -18), (11, -9), (12, -17), (13, -20), (14, -17), (15, -14), (16, -9), (17, -15),
               (18, -7), (19, -8), (20, 0), (21, -2), (22, -5), (23, -4), (24, -1), (25, -11), (26, -11),
               (27, -4), (28, -13), (29, -10), (30, -5), (31, -11), (32, -13), (33, -8), (34, -15),
               (35, -13), (36, -11), (37, -16), (38, -15), (39, -18), (40, -6), (41, -18), (42, -19),
               (43, -23), (44, -23), (45, -13), (46, -19), (47, -25), (48, -28), (49, -24), (50, -19),
               (51, -19)]


def buzz(turns, raising_s=0.077):
    """The clean buzz is a stack of shaft harmonics, whose balance changes as the head is raised."""
    raised = ramp(TIME, RAISED_S - raising_s, RAISED_S)
    return np.sqrt(1 - raised) * hum(turns, BUZZ) + np.sqrt(raised) * hum(turns, BUZZ_RAISED)


# Level when laden before later trims, and its rise with each extra turn per second
DRIVE_DB, DRIVE_DB_PER_HZ = -43, 0.0837
BRUSH_DB, BRUSH_DB_PER_HZ = -63, 0.1357
SMOOTH_TICKS = 0.55  # share of the ticks left when the shaft runs smoothly
RAISED_DB = -1.5  # drop when drawn away from the microphone


def whisk(speed, buzz_db=-0.5, rasp_db=-2.0, throb_db=0.45):
    """The motor's sounds follow one turning shaft, whose speed wavers with drag. Gives (clean tones, clatter)."""
    uneven = unevenness(speed)
    wavering = speed * (1 + (.00032 + .003 * uneven ** 4) * drift(60))
    turns = np.cumsum(wavering) / SR
    dipped = 1 - ramp(TIME, OUT_S - .02, OUT_S + .015)
    coasting = ramp(TIME, OFF_S, OFF_S + .03)
    # The laden shaft binds as it turns
    binding = np.cos(2 * np.pi * turns) + np.cos(2 * np.pi * 2 * turns)
    throb = gain_of(throb_db * depth(speed) * binding)
    drive = gain_of(DRIVE_DB + DRIVE_DB_PER_HZ * (speed - LADEN_HZ))
    clean = drive * np.sqrt(1 - uneven ** 2) * gain_of(buzz_db) * buzz(turns)
    rough = drive * uneven * gain_of(rasp_db) * steadied(throb * rasp(turns))
    brush_gain = gain_of(BRUSH_DB + BRUSH_DB_PER_HZ * (speed - LADEN_HZ))
    brushes = brush_gain * (SMOOTH_TICKS + (1 - SMOOTH_TICKS) * uneven) * ticks(turns, uneven)
    presence = ramp(speed - 1, 0, STALL_HZ) * gain_of(RAISED_DB * ramp(TIME, RAISED_S - .1, RAISED_S + .05))
    tone = presence * clean + whine(turns) + glides(turns)
    clatter = presence * (rough + brushes) + dipped * bearing_taps(turns)
    clatter = clatter + knocking(turns, speed, uneven, dipped, coasting)
    return tone, clatter + shake(turns, speed, dipped, coasting)


def scene(room_db=-8, tone_room_db=-15):
    """Whisk, liquid and jar in the kitchen; the clean tones reach the microphone almost dry."""
    speed = shaft_speed()
    tone, clatter = whisk(speed)
    near = clatter + liquid(speed) + gulps(speed) + glugs() + jar(speed)
    reflected = room(gain_of(room_db) * near + gain_of(tone_room_db) * tone)
    return ports(near + tone) + glass_echo(clatter + tone) + reflected + kitchen()


def record(dry, low_cut_hz=62.5, edge_hz=15700):
    """The microphone drops the deep bass, then everything above its upper edge."""
    lean = signal.sosfilt(signal.butter(2, low_cut_hz, "high", fs=SR, output="sos"), dry)
    band_limit = signal.firwin(511, edge_hz, window=("kaiser", 9), fs=SR)
    return signal.oaconvolve(lean, band_limit[None], "same")


dry = scene()
out = record(dry)
to_wav(out)
```